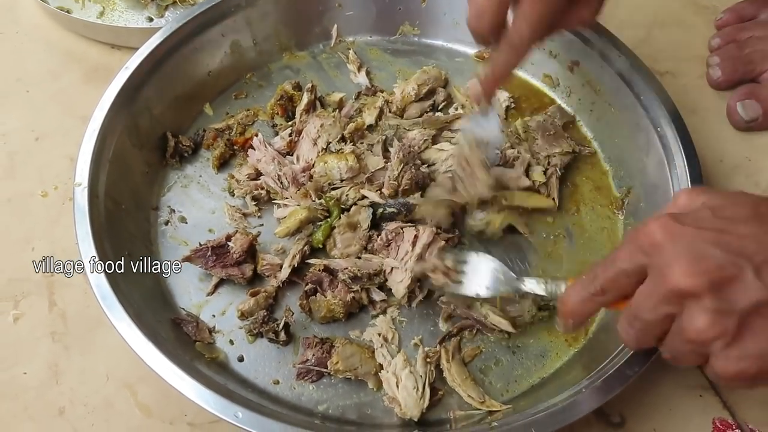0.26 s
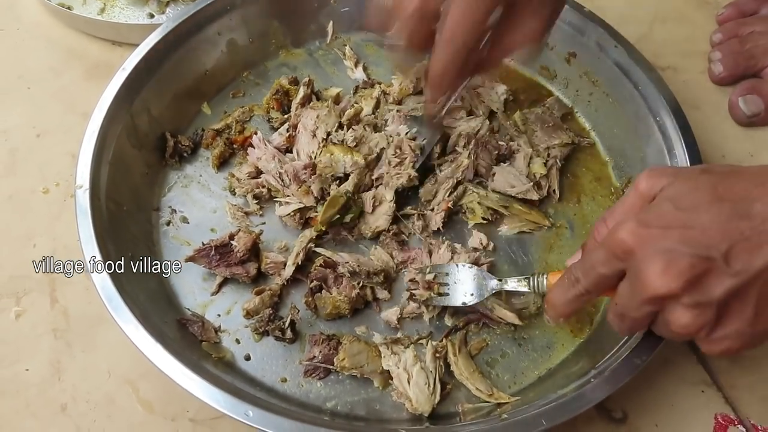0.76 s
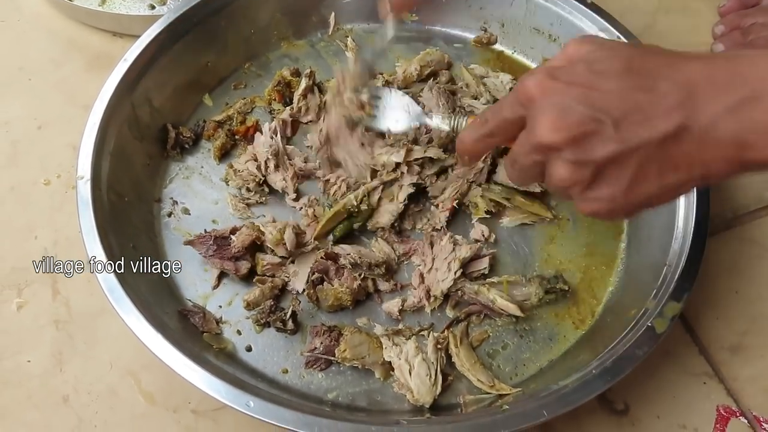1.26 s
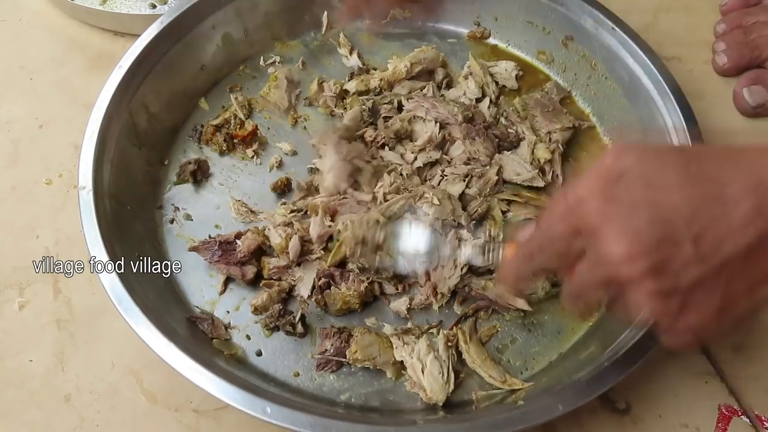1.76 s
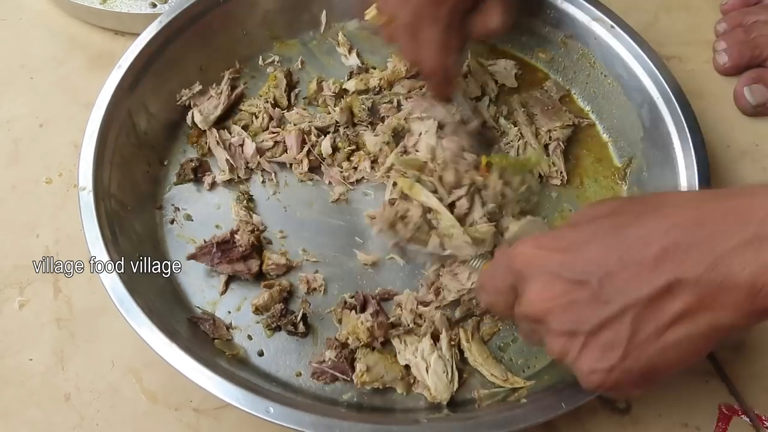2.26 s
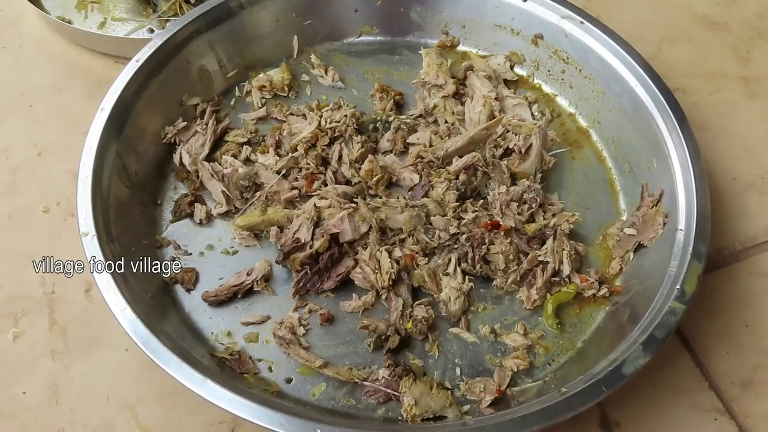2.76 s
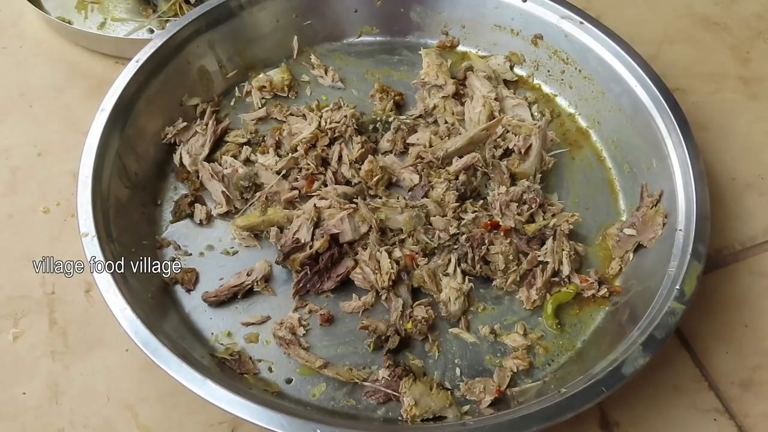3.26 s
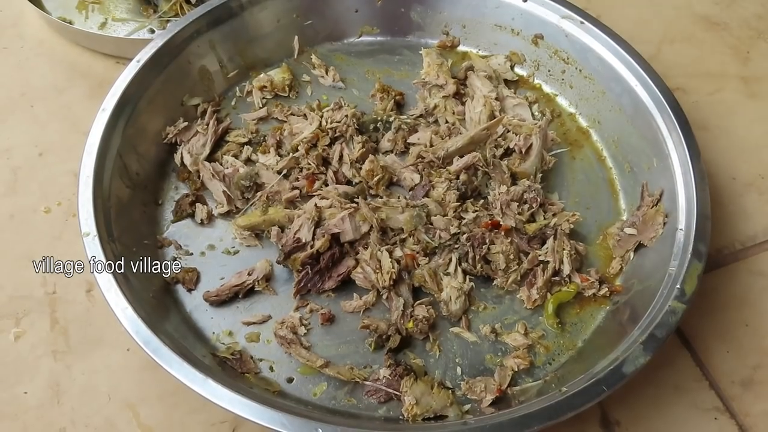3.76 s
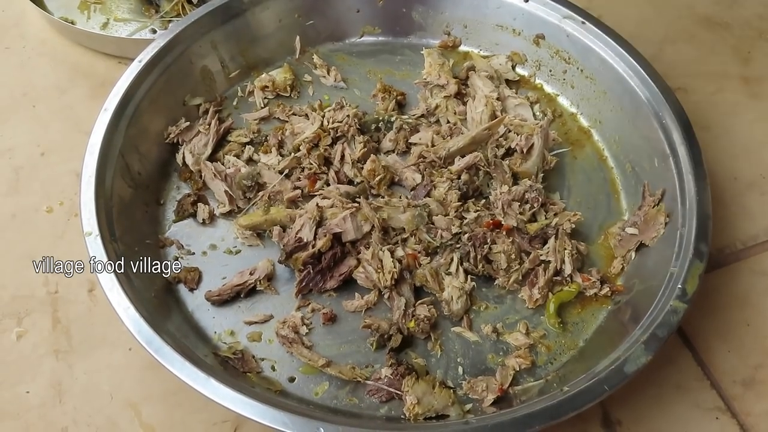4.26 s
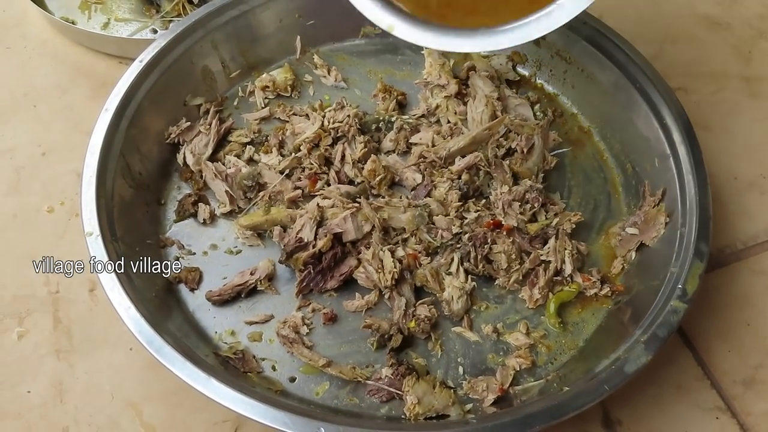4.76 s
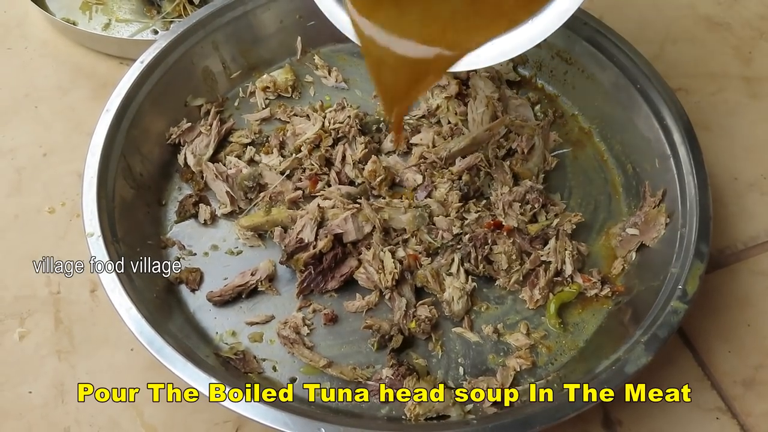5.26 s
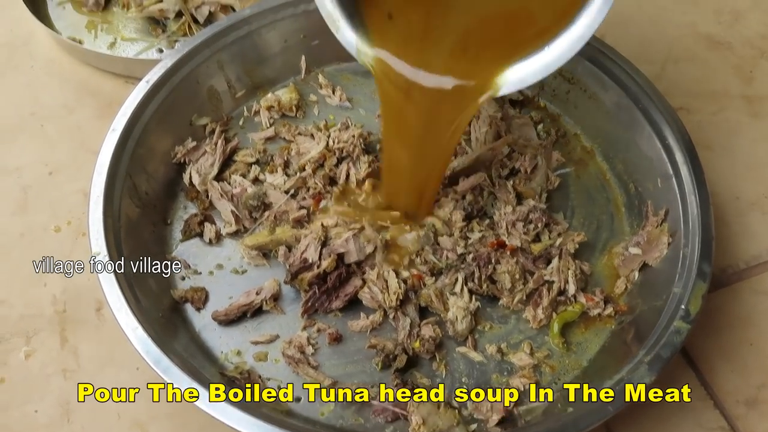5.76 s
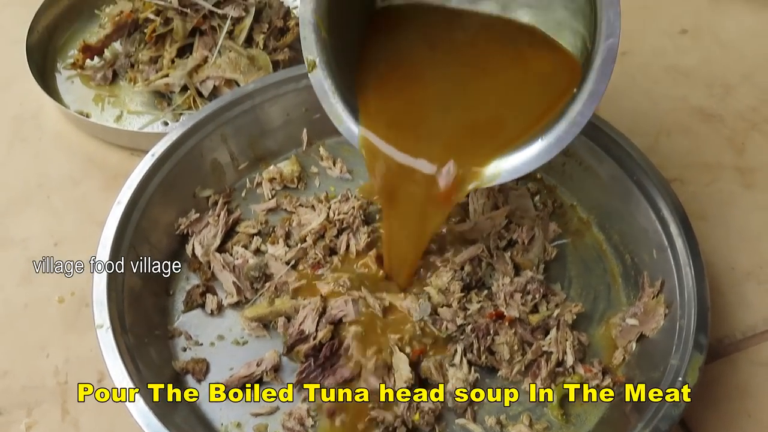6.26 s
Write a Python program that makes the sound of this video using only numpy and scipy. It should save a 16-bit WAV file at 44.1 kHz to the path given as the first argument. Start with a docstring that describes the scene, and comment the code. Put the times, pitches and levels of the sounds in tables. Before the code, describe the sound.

Faint quick rasping swishes and fork clicks on a steel tray, then abruptly a louder open outdoor rumble with long, rushing, broom-like noise strokes.

```python
"""Quick swishes, then sweeping the yard

Quick, quiet rasping swishes, probably sped-up broom sweeps, are shaped noise in three bands; soft rubs and
fork clicks on a steel tray of meat are noise bursts through resonances, over a murky low rumble.
Then an open rumble with a faint engine drone takes over at once, under the long rushing noise strokes
of what is most likely a stiff broom. Resonant ticks, one bright crackle, a two-mode thump, thin wavering
tones and one very high rustling band dot the scene.
"""
import sys
import numpy as np
from scipy import signal
from scipy.fft import rfft, irfft, next_fast_len
from scipy.io import wavfile
from scipy.ndimage import uniform_filter1d, map_coordinates

SR = 44100
rng = np.random.default_rng(int(sys.argv[2]) if len(sys.argv) > 2 else 0)


def master_out(mix):
    """Clip the mix to full scale and print it as 16-bit PCM to the path in sys.argv[1]."""
    frames = np.transpose(np.atleast_2d(mix))
    ceiling = np.clip(frames, -1, 1)
    pcm = np.round(ceiling * 32767).astype(np.int16)
    wavfile.write(sys.argv[1], SR, pcm)


N = 287532
T = np.arange(N) / SR
SIZE = next_fast_len(N)
HZ = np.maximum(np.arange(SIZE // 2 + 1) * SR / SIZE, 1)
OPEN_S = 2.423  # the open yard takes over from the quick swishes
TOP_HZ = 15620

# Event levels below are set before the gain of their layer.
# Quick swishes: start_s (full pressure), hold_s, attack_s, level_db, swell_db (over the hold),
# body_db and edge_db (relative to level)
QUICK_STROKES = [(0.0, 0.019, .05, -52.5, 0, -15, -2), (.125, 0.069, 0.11, -52, 4.5, -11, -6),
                 (.304, 0.019, 0.011, -55.5, -1, 0.5, -8), (.412, 0.047, 0.051, -48, -1, -11.5, -8),
                 (.565, 0.082, .025, -49, -5, -8, -7.5), (.708, .008, .03, -61, -6, -6, -21),
                 (.78, 0.045, 0.034, -47.5, 1.5, -9, -6.5), (.973, 0.06, 0.036, -46, 0, -13, -4.5),
                 (1.158, 0.035, 0.036, -50, 1.5, -13, -2), (1.26, 0.025, 0.056, -48.5, 1, -11.5, -6.5),
                 (1.34, .033, .08, -50, 1, -15, -6), (1.42, .027, .06, -50, -0.5, -10.5, -5),
                 (1.496, 0.023, 0.046, -57, 0, -6, 2), (1.603, 0.061, 0.011, -49.5, 0, -15, -6.5),
                 (1.718, .008, .04, -60.5, -1, -0.5, -12), (1.788, 0.058, 0.013, -48, -1, -5.5, -4.5),
                 (1.902, .012, 0.021, -54.5, -3, 0, 0), (1.965, 0.037, 0.033, -50.5, -0.5, -12, -0.5),
                 (2.02, .025, .04, -58, 1, -1.5, -5), (2.172, 0.026, 0.042, -46.5, 2.5, -12.5, -3.5),
                 (2.252, 0.0065, 0.027, -56.5, -3, -2, -3), (2.295, .012, .02, -57.5, -6, 2, -4),
                 (2.338, 0.028, 0.025, -46.5, 2, -10, -3.5), (2.412, .015, 0.055, -46.5, 7, -7, -10)]
# Broom strokes: start_s (full pressure), hold_s, attack_s, level_db, swell_db (over the hold),
# body_db and edge_db (relative to level)
SWEEPS = [(2.59, 0.26, 0.019, -29.5, 5, -11, -8), (3.44, 0.37, 0.078, -25.5, 2.5, -10, -11.5),
          (4.31, 0.25, 0.1, -27, 4, -13, -8), (5.015, 0.038, 0.11, -28.5, 0, -13, -5.5),
          (5.62, 0.29, 0.12, -28, -5.5, -12, -7.5), (6.405, 0.068, 0.1, -26.5, 0.5, -9.5, -7)]
# Bristles landing lightly before a sweep: start_s (full pressure), level_db, edge_db (relative to level)
BRISTLE_TOUCHES = [(2.51, -43.5, -12.5), (3.275, -48, -7), (4.135, -44, -3), (4.85, -44.5, -6.5),
                   (5.405, -46, 0), (6.205, -42.5, -6)]
TOUCH_HOLD_S, TOUCH_ATTACK_S, TOUCH_BODY_DB = 0.1, 0.051, -10
# Attack and release times span 20 dB, less the easing near full pressure
QUICK_RELEASE_S, SWEEP_RELEASE_S = 0.052, 0.19
# Quiet noise bed between strokes: body_db, middle_db, edge_db
QUICK_REST, SWEEP_REST = (-68.5, -75, -85), (-53, -48.5, -63.5)
# Colour of the quick swishes: frequency_hz, density_db (per Hz)
QUICK_RASP = [(300, -9.5), (850, -10.5), (1250, -6.5), (1500, -5), (1750, -6.5), (2600, -2.5), (3300, -3.5),
              (4500, -4), (7000, -9.5), (10000, -14.5), (15500, -19)]
# Colour of the broom rasp: frequency_hz, density_db (per Hz)
BROOM_RASP = [(300, -29), (650, -14), (1100, -12), (1600, -4.5), (2350, 0.5), (3000, 0), (4200, -0.5),
              (6000, -5), (8000, -10), (11000, -15.5), (15500, -22.5)]
# Stereo width of the broom: frequency_hz, side_db (relative to mid)
BROOM_WIDTH = [(600, -21), (1400, -32), (2100, -23), (2800, -13.5), (4400, -9.5), (8000, -2.5), (11000, 1),
               (14000, 6)]
# Fork clicks on the tray: start_s, level_db, contact_s, brightness_db (per octave)
FORK_CLICKS = [(0.274, -48, 0.0061, -7), (0.3, -45.5, 0.009, -19), (0.413, -49, 0.0046, -1),
               (0.553, -49, 0.004, -13), (0.807, -31.5, 0.0087, 2.5), (.952, -51, 0.0074, 5),
               (1.256, -46, 0.029, -8), (1.599, -34, 0.0055, 0.5), (1.785, -40.5, 0.0058, 1),
               (1.833, -39, 0.0046, -2), (1.988, -43, 0.0061, -2), (2.132, -50, 0.0048, -7),
               (2.286, -45, 0.0052, 1)]
# Resonances of the tray, damped by the meat: pitch_hz, width_hz, level_db
TRAY_MODES = [(1260, 160, -2), (1520, 370, 7), (2650, 500, -16), (3670, 410, 6.5), (4700, 260, 3),
              (7800, 3000, -36)]
# Dull rubs and squelches: start_s, length_s, pitch_hz, width_hz, level_db
RUBS = [(1.051, 0.089, 386, 600, -59), (1.811, 0.066, 400, 600, -55), (2.224, 0.064, 575, 260, -46.5),
        (2.268, 0.13, 590, 260, -54), (2.299, .032, 1430, 220, -49)]
# Small ticks and knocks: start_s, level_db, pitch_hz, width_hz, decay_s
TICKS = [(2.052, -42, 1460, 350, 0.0046), (2.338, -43, 1450, 200, 0.013), (2.585, -28, 2410, 600, 0.012),
         (2.586, -27, 6460, 5960, 0.0078), (2.618, -25, 2980, 2500, 0.0042),
         (3.400, -29, 1580, 300, 0.0048), (3.416, -23.5, 1660, 300, 0.0045),
         (4.127, -28, 1230, 650, 0.0022), (6.064, -30, 1190, 380, 0.0038), (6.243, -39, 1600, 400, .006)]
# Thin faint wavering tones, and one very high rustling band, perhaps an insect:
# start_s, length_s, pitch_hz, waver_hz (rms), level_db
FAINT_TONES = [(3.06, 0.19, 635, 60, -47.5), (3.065, 0.13, 12400, 220, -57),
               (3.082, 0.21, 2440, 7.3, -54.5), (5.222, .2, 2360, 11, -54), (5.963, 0.12, 2730, 4.7, -46),
               (6.185, .16, 2812, 3.3, -44)]
# Colour of the open yard rumble: frequency_hz, density_db (per Hz)
YARD_COLOUR = [(20, -18), (40, -8.5), (60, -1.5), (90, 0), (112, -4.5), (135, -1.5), (170, -8), (200, -6.5),
               (250, -11.5), (370, -14.5), (520, -23), (1000, -22), (2000, -32), (6000, -53)]
# Stereo width of the diffuse outdoor air: frequency_hz, side_db (relative to mid)
AIR_WIDTH = [(110, -42.5), (200, -19.5), (400, -9), (800, -7), (1600, -7.5), (4000, 5)]
# Centre level of the murky rumble under the quick swishes: time_s, level_db
MURK_CENTRE = [(0.0, -55.5), (0.07, -56), (0.09, -68), (0.37, -56), (0.39, -63), (0.63, -53), (1.24, -70),
               (1.28, -52.5), (1.38, -55), (1.42, -71), (1.47, -57), (1.5, -69), (1.58, -54), (1.78, -54),
               (1.84, -61), (2.4, -66)]
# Colour of the murky rumble: frequency_hz, density_db (per Hz)
MURK_COLOUR = [(20, -8), (50, -4.5), (130, 0.5), (200, -8.5), (300, -13.5), (600, -29.5), (1200, -28),
               (4000, -39)]


def quick_strokes():
    """Quick, quiet rasping swishes, probably sped-up broom sweeps: patchy noise with fast level grit."""
    grit = patchy(rng.standard_normal((2, N)), spread_db=3.5, patch_hz=300, patch_s=0.025)
    grit = grit * undb(0.78 * walk(900))
    gains = pressure(QUICK_STROKES, QUICK_REST, QUICK_RELEASE_S, ease=0.092, edge_lead=0.25,
                     body_lag=1.2, edge_lag=0.86, body_rise_db=0.5, edge_drop_db=1)
    return strokes(grit, gains, QUICK_RASP, chatter_db=1.0, chatter_rate=160,
                   echo=0.17, edge_db=0.4, edge_hz=6240)


def forks(ring_db, ring_s, gain_db):
    """Tines chatter on the tray for a few ms; the meat damps the ring that follows."""
    out = np.zeros((2, N))
    t = T[:SR // 5]
    for at, db, contact, tilt in FORK_CLICKS:
        tail = undb(ring_db) * np.exp(-(t - contact) / ring_s)
        push = np.where(t < contact, 1, tail)
        chatter = rng.standard_normal((2, len(t)))
        ring = 0
        for hz, width, mode_db in TRAY_MODES:
            mode_gain = undb(mode_db + tilt * np.log2(hz / 3000))
            ring = ring + mode_gain * resonate(chatter, hz, width)
        start = int(at * SR)
        out[:, start:start + len(t)] += undb(db + gain_db) * unit(ring) * push
    return out


def rubs(gain_db):
    """Soft rubbing noises, each swelling in one dull resonance."""
    out = np.zeros((2, N))
    for at, length, hz, width, db in RUBS:
        count, start = int(length * SR), int(at * SR)
        friction = rng.standard_normal((2, SR))
        rub = resonate(resonate(friction, hz, width), hz, width)[:, -count:]
        swell = signal.windows.tukey(count, 0.5)
        out[:, start:start + count] += undb(db + gain_db) * unit(rub) * swell
    return out


def broom():
    """The bristles touch down, then are pressed along the ground in a long sweep."""
    bristles = patchy(outdoor_noise(BROOM_WIDTH), spread_db=3.0, patch_hz=90.4, patch_s=0.06)
    touches = [(at, TOUCH_HOLD_S, TOUCH_ATTACK_S, db, 0, TOUCH_BODY_DB, edge_db)
               for at, db, edge_db in BRISTLE_TOUCHES]
    gains = pressure(SWEEPS + touches, SWEEP_REST, SWEEP_RELEASE_S, ease=0.19, edge_lead=0.26,
                     body_lag=1.03, edge_lag=0.9, body_rise_db=2, edge_drop_db=2.5)
    return strokes(bristles, gains, BROOM_RASP, chatter_db=0.43, chatter_rate=50,
                   echo=0.096, edge_db=3.0, edge_hz=5670)


def pressure(rows, rest_db, release, ease, edge_lead, body_lag, edge_lag, body_rise_db, edge_drop_db):
    """Body, middle and edge gains: strokes attack, grow duller, release; edge comes and goes first."""
    t = T[::32]
    power = undb(rest_db)[:, None] ** 2 + np.zeros(len(t))

    def ramp(share):
        """dB lost along an attack or release, eased into and out of the hold."""
        return 20 * (np.hypot(np.maximum(share, 0), ease) - ease)

    for at, hold, attack, db, swell_db, body_db, edge_db in rows:
        along = np.clip((t - at) / hold, 0, 1) - 0.5
        held = db + swell_db * along
        early = (at - t) / attack
        rise = ramp(early)
        fade = ramp((t - at - hold) / release)
        body = held + body_db + body_rise_db * along - rise - fade / body_lag
        middle = held - rise - fade
        edge_loss = (ramp(early - edge_lead) + fade) / edge_lag
        edge = held + edge_db - edge_drop_db * along - edge_loss
        power = power + undb([body, middle, edge]) ** 2
    return [np.interp(T, t, np.sqrt(band)) for band in power]


def strokes(noise, gains, rasp, chatter_db, chatter_rate, echo, edge_db, edge_hz):
    """Dense noise in three bands makes a rasp; each stroke sets its body and edge."""
    body, middle, edge = gains
    # a faint, randomly drifting echo colours the rasp
    lag_s = 0.001094 + 0.000226 * walk(2.5)
    delayed = np.array([np.interp(T - lag_s, T, channel) for channel in noise])
    noise = noise + echo * delayed
    low = 1 / (1 + (HZ / 1900) ** 8)
    high = 1 / (1 + (edge_hz / HZ) ** 8)
    bands = ((low, body), (1 - low - high, middle), (high, edge * undb(edge_db)))
    out = 0
    for share, gain in bands:
        part = filtered(noise, colour(rasp) * share)
        out = out + part / np.std(part.mean(axis=0)) * gain
    # the level chatters unevenly
    return out * undb(chatter_db * walk(chatter_rate))


def patchy(x, spread_db, patch_hz, patch_s):
    """Random patches of louder and softer noise keep shifting the colour."""
    hz, t, cells = signal.stft(x, SR, nperseg=1024)
    where = np.meshgrid(hz / patch_hz, t / patch_s, indexing="ij")
    field = map_coordinates(rng.standard_normal((512, 512)), where, order=1, mode="mirror")
    return signal.istft(cells * undb(spread_db * field), SR)[1][:, :N]


def snag(at, db, rise, decay, side_db):
    """Something catches once, straight ahead, and springs free in a bright crackle."""
    swell = np.exp(-np.maximum((at - T) / rise, (T - at) / decay))
    mid, side = rng.standard_normal((2, N)) * undb(1.5 * walk(600))
    bright = colour([(900, -17), (2000, 6.5), (7500, 2), (15000, -20)])
    crackle = filtered(pair(mid, undb(side_db) * side), bright)
    return unit(crackle) * swell * undb(db)


def ticks(gain_db, side_db):
    """Short knocks, each a decaying noise blow rung through one resonance."""
    out = np.zeros((2, N))
    t = T[:SR // 8]
    for at, db, hz, width, decay in TICKS:
        blow = rng.standard_normal((2, len(t))) * np.exp(-t / decay)
        ring = resonate(resonate(blow, hz, width), hz, 2 * width)
        # energy in proportion to the decay time
        mid, side = ring / np.sqrt(np.sum(ring ** 2, axis=1, keepdims=True) / (decay * SR / 2))
        start = int(at * SR)
        out[:, start:start + len(t)] += undb(db + gain_db) * pair(mid, undb(side_db) * side)
    return out


def thump(at, db, hz, decay):
    """A soft, deep bump with two low modes."""
    t = np.maximum(T - at, 0)
    deep = np.sin(2 * np.pi * hz * t) * np.exp(-t / decay)
    upper = 2.1 * np.sin(2 * np.pi * 92 * t) * np.exp(-t / 0.03)
    soft_onset = 1 - np.exp(-t / 0.0049)
    return undb(db) * (deep + upper) * soft_onset


def faint_tones(gain_db, flutter_db):
    """Sines wavering in pitch and strength: thin tones, and a high rustling band where the waver is wide."""
    out = np.zeros(N)
    waver, flutter = walk(120), undb(flutter_db * walk(35))
    for at, length, hz, waver_hz, db in FAINT_TONES:
        count, start = int(length * SR), int(at * SR)
        span = slice(start, start + count)
        phase = 2 * np.pi * np.cumsum(hz + waver_hz * waver[span]) / SR
        note = np.sin(phase) * flutter[span]
        out[span] += undb(db + gain_db) * unit(note) * signal.windows.tukey(count, 0.3)
    return out


def rumble(db, hum_hz, hum_db):
    """Swaying low noise outdoors, with the wavering sine drone of a far engine."""
    air = unit(filtered(outdoor_noise(AIR_WIDTH), colour(YARD_COLOUR)))
    air = air * undb(0.7 * walk(3.09))
    phase = 2 * np.pi * np.cumsum(hum_hz * (1 + 0.0211 * walk(9))) / SR
    drone = np.sin(phase) * undb(2.4 * walk(4.66))
    return undb(db) * air + undb(hum_db) * unit(drone)


def murk(whole_db, least_side_db):
    """Low noise wandering between centre and sides: as the centre weakens, the sides fill in."""
    centre = undb(np.interp(T, *np.transpose(MURK_CENTRE)))
    side_power = undb(whole_db) ** 2 - centre ** 2
    sides = np.sqrt(np.maximum(side_power, undb(least_side_db) ** 2))
    mid, side = unit(filtered(rng.standard_normal((2, N)), colour(MURK_COLOUR)))
    return pair(mid * centre, side * sides)


def outdoor_noise(width):
    """Noise whose side-to-mid balance follows frequency: narrow low down, wide in the top."""
    return pair(rng.standard_normal(N), filtered(rng.standard_normal(N), colour(width)))


def undb(db):
    """Decibels to gain."""
    return 10 ** (np.asarray(db) / 20)


def unit(x):
    """Scale to rms 1."""
    return x / np.sqrt(np.mean(x ** 2))


def colour(points):
    """Gain at every frequency from (Hz, dB) points."""
    hz, db = np.transpose(points)
    return undb(np.interp(np.log(HZ), np.log(hz), db))


def filtered(x, gain):
    """Pass x through a frequency response."""
    return irfft(rfft(x, SIZE) * gain, SIZE)[..., :N]


def resonate(x, hz, width):
    """Two-pole resonance, gain 1 at the centre."""
    b, a = signal.iirpeak(min(hz, SR / 2 - 1), hz / width, fs=SR)
    return signal.lfilter(b, a, x)


def walk(rate):
    """Random drift of rms 1: a new level every 1 / rate s, with slewed steps."""
    hold = int(SR / rate)
    levels = np.repeat(rng.standard_normal(N // hold + 1), hold)
    return unit(uniform_filter1d(levels, hold)[:N])


def pair(mid, side):
    """Left and right from mid and side."""
    return np.array([mid + side, mid - side])


def scene():
    """Quiet swishes and clicks give way at once to the open yard; ticks, crackle and tones lie on top."""
    quick = undb(-0.95) * quick_strokes() + undb(2.0) * murk(whole_db=-56.5, least_side_db=-67)
    quick = quick + rubs(gain_db=1.5) + forks(ring_db=-7, ring_s=0.022, gain_db=0.1)
    yard = undb(-2.0) * broom() + rumble(db=-37.0, hum_hz=89.7, hum_db=-46.0)
    yard = yard + thump(at=4.885, db=-27, hz=60.3, decay=0.15)
    catch = snag(at=2.724, db=-17.5, rise=0.01, decay=0.031, side_db=-24)
    ground = np.where(T < OPEN_S, quick, yard)
    return ground + ticks(gain_db=2.0, side_db=-30) + catch + faint_tones(gain_db=-2.5, flutter_db=4.5)


def record(dry):
    """A steep elliptic low-pass cuts the top."""
    return signal.sosfilt(signal.ellip(12, 0.1, 80, TOP_HZ, fs=SR, output="sos"), dry)


dry = scene()
out = record(dry)
master_out(out)
```